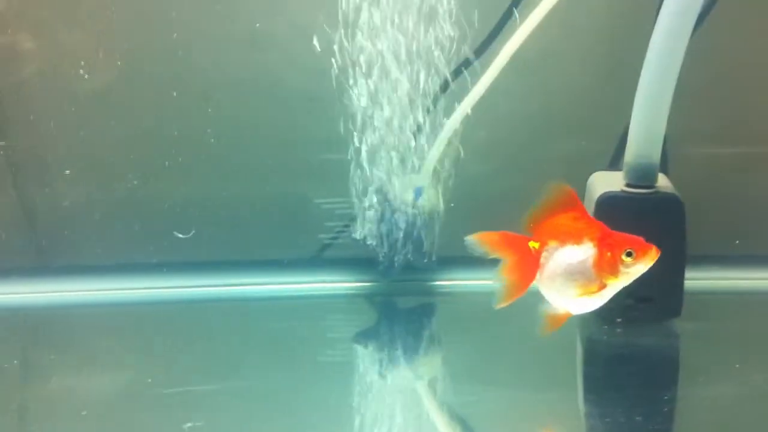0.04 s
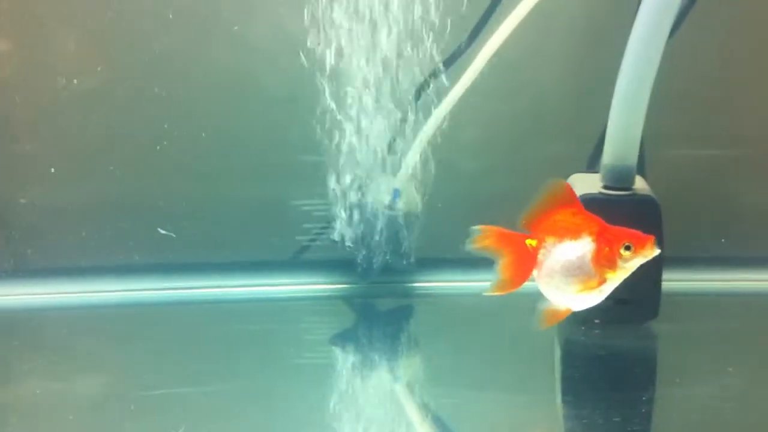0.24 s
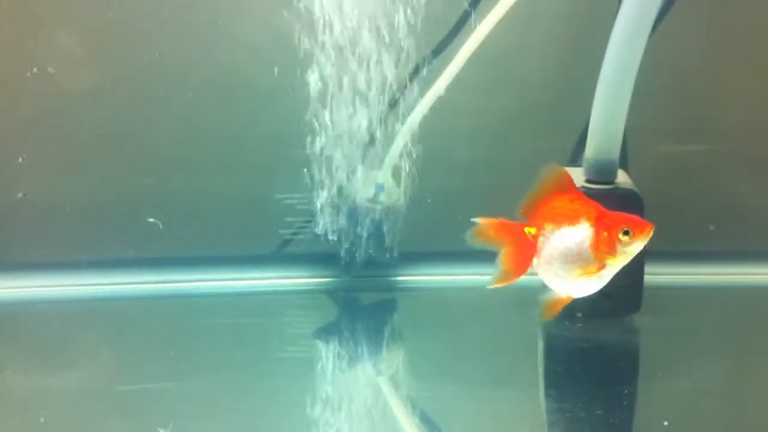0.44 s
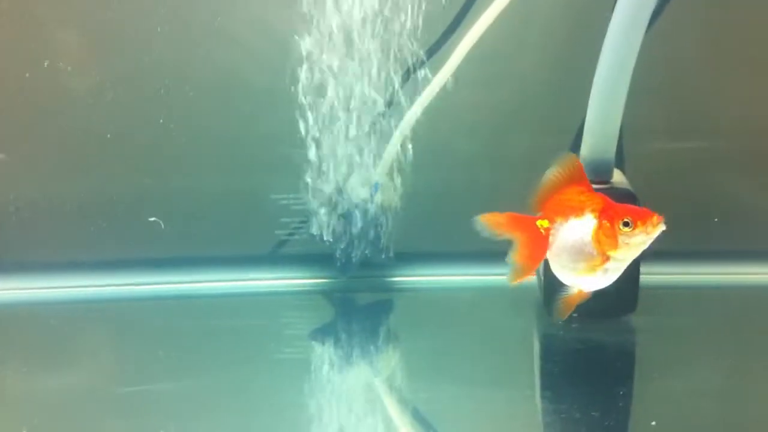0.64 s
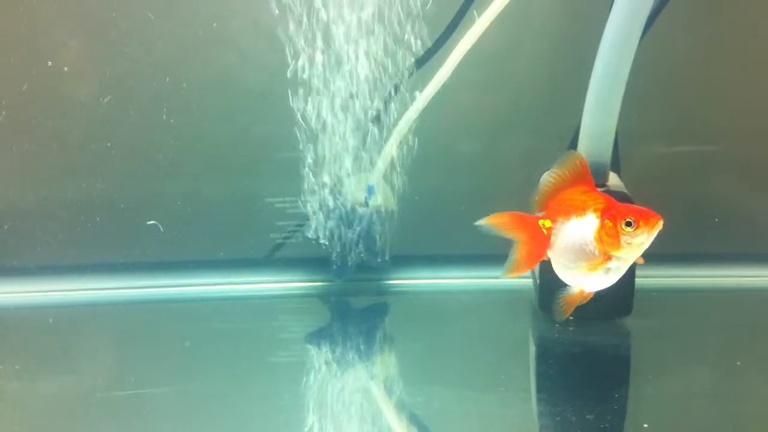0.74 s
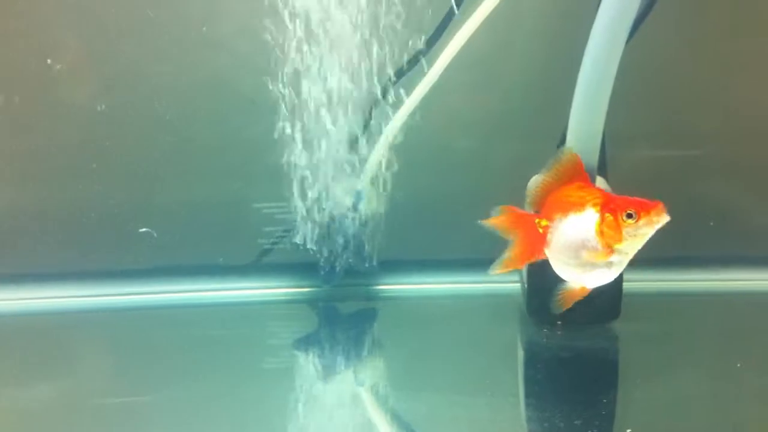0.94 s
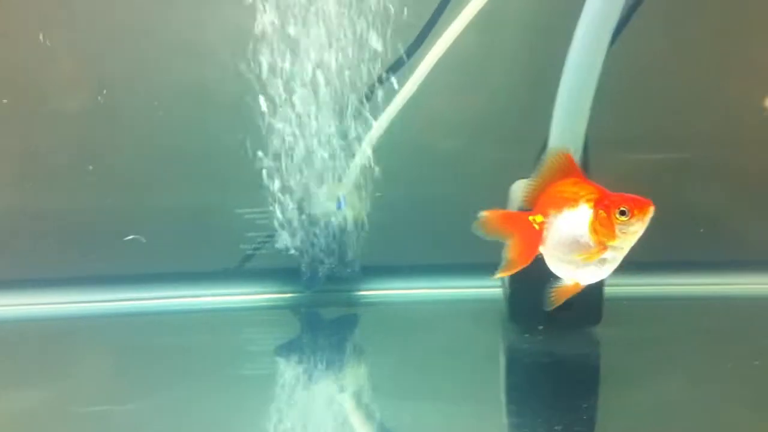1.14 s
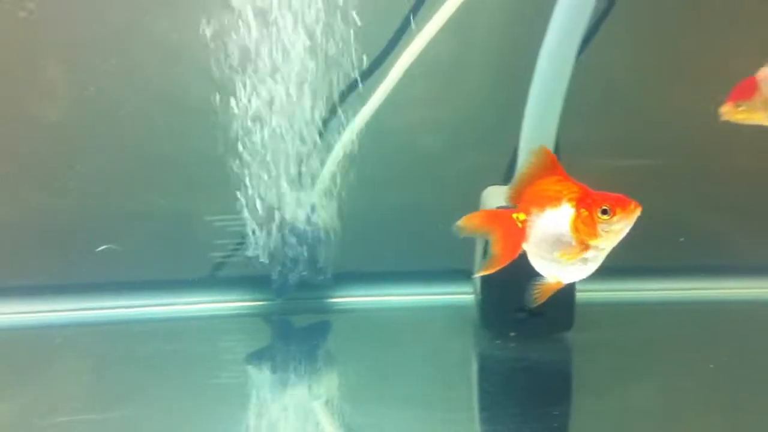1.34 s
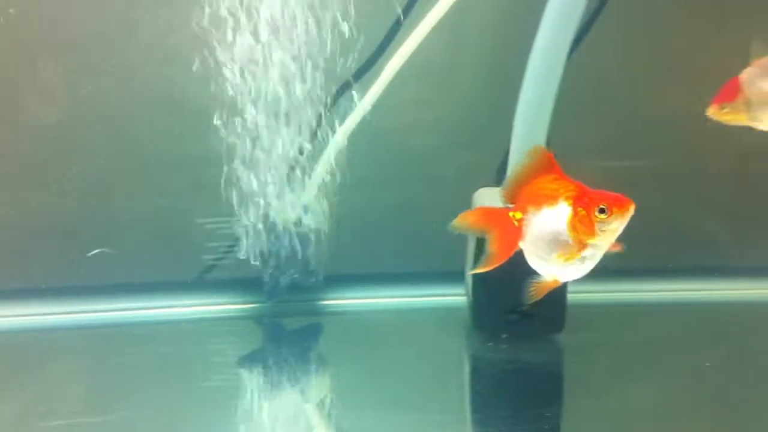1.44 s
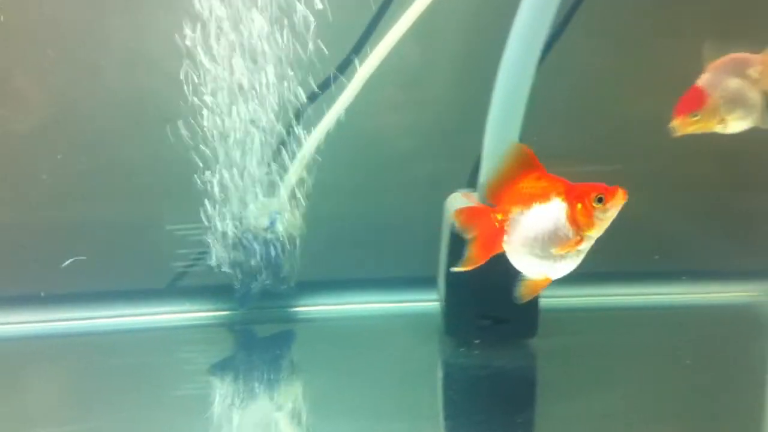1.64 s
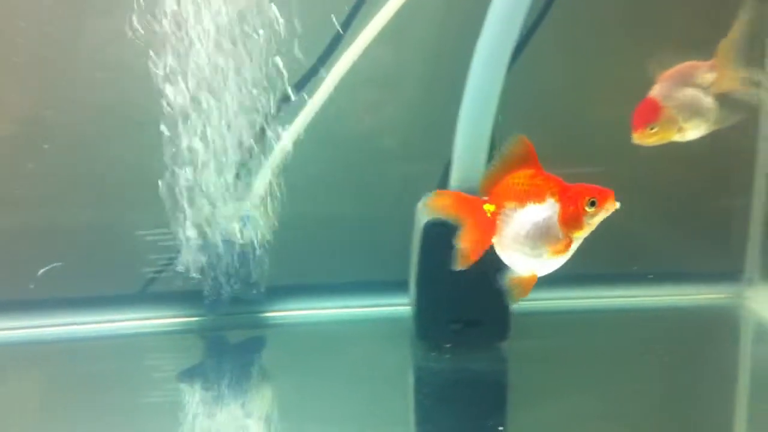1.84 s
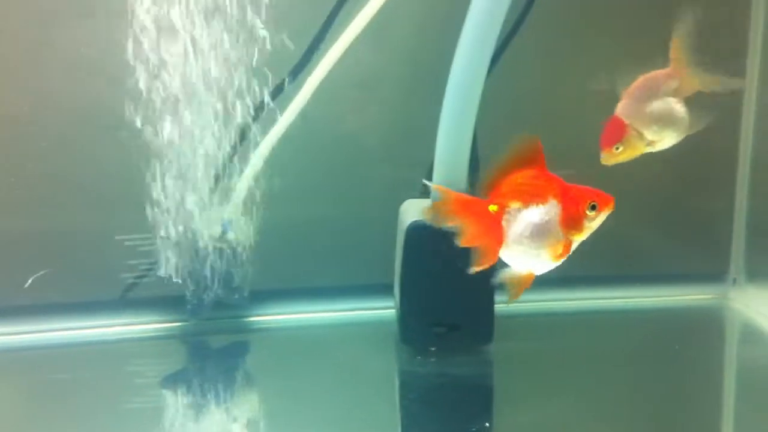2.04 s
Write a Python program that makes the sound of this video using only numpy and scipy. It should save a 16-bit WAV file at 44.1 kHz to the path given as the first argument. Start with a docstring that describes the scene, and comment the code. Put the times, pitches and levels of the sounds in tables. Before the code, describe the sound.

Air stone bubbling in a home fish tank: a continuous watery rush with single gurgles, quick flurries of tiny bubbles and fine surface fizz over a low wavering pump hum, heard close through air in a small room.

```python
"""An air stone bubbles in a home fish tank, heard through air in a small room, for about two seconds.
From the start a dense rush of damped bubble tones and noise runs over the air pump's hum of sines.
Flurries of tiny bubbles (clouds of very short rings) and single large gurgles soon join and recur.
Near 1.2 s the wavering strongest overtone of the hum all but vanishes for a moment; gurgles crowd near
1.83 s, and the fine fizz of surface bursts, heard throughout, is strongest at the very end."""
import sys
import numpy as np
from scipy import signal
from scipy.fft import rfft, irfft, next_fast_len
from scipy.io import wavfile
from scipy.ndimage import uniform_filter1d, map_coordinates

SR = 44100
rng = np.random.default_rng(int(sys.argv[2]) if len(sys.argv) > 2 else 0)


def boost_factor(decibels):
    """Convert a level in decibels to a linear amplitude factor."""
    exponent = np.asarray(decibels, float) / 20
    return 10 ** exponent


def dump(signal):
    """Clip the signal to [-1, 1] and save it as 16-bit WAV at the path in sys.argv[1]."""
    limited = np.clip(np.atleast_2d(signal).T, -1, 1)
    pcm = np.round(limited * 32767).astype(np.int16)
    wavfile.write(sys.argv[1], SR, pcm)


N = 91860  # length in samples
SIZE_SCATTER_DB = 3.5  # standard deviation of the energy of bubbles in a stream or flurry


def unit(x):
    """Normalisation: scale to rms 1."""
    return x / np.sqrt(np.mean(x ** 2) + 1e-20)


def curve(rows):
    """Linear interpolation: (time [s], value) rows as one value per sample."""
    time_s, value = np.transpose(rows)
    return np.interp(np.arange(N) / SR, time_s, value)


def wobble(rate):
    """Band-limited randomness: a smooth curve through random knots, rate of them a second."""
    knots = rng.standard_normal(400)
    return map_coordinates(knots, [np.arange(N) * rate / SR], mode="mirror")


def coloured(x, points):
    """Linear filtering: weights the spectrum of x by (frequency [Hz], gain [dB]) points, to rms 1."""
    hz, db = np.transpose(points)
    size = next_fast_len(N + 8192)
    bin_hz = np.fft.rfftfreq(size, 1 / SR)
    gain_db = np.interp(np.log(bin_hz + 1), np.log(hz + 1), db)  # read on a log axis
    return unit(irfft(rfft(x, size) * boost_factor(gain_db), size)[:N])


def patchy(x, patchy_db, bins, frames):
    """Random modulation: patches of gain in time and frequency, patchy_db rms."""
    spectrum = signal.stft(x, nperseg=256)[2]
    field = rng.standard_normal(spectrum.shape)
    for _ in range(2):
        field = uniform_filter1d(field, bins, axis=0)
        field = uniform_filter1d(field, frames, axis=1)
    return signal.istft(spectrum * boost_factor(patchy_db * unit(field)), nperseg=256)[1][:N]


def bubbles(start_s, hz, energy, life_s, size):
    """Bubble resonance: soft-starting, damped, rising sines; energy is level squared x seconds."""
    rise_per_s = 0.4  # fractional rise in pitch
    start_s = np.clip(start_s, 0, N / SR)
    first = np.ceil(start_s * SR).astype(int)
    index = first[:, None] + np.arange(size)
    t = index / SR - start_s[:, None]
    life_s = np.reshape(life_s, (-1, 1))
    envelope = t / life_s * np.exp(-2 * t / life_s)  # peaks at half the life
    ring = envelope * np.sin(2 * np.pi * hz[:, None] * t * (1 + rise_per_s * t / 2))
    ring *= np.sqrt(64 * energy[:, None] / life_s)  # the envelope and sine alone hold life / 64
    return np.bincount(index.ravel(), ring.ravel(), N + 2 * size)[:N]


def stream(lo_hz, hi_hz, life_s, share, count, size):
    """Superposition: bubbles at random times and pitches over white noise; share weights their power."""
    when, pitch = rng.random((count, 2)).T
    energy = boost_factor(2 * SIZE_SCATTER_DB * rng.standard_normal(count))
    grains = bubbles(when * N / SR, lo_hz + (hi_hz - lo_hz) * pitch, energy, life_s, size)
    # as much power as white noise of rms 1 has in the same band
    grains *= np.sqrt((hi_hz - lo_hz) / (SR / 2)) / np.std(grains)
    return np.sqrt(share) * grains + np.sqrt(1 - share) * rng.standard_normal(N)


def room(x, wet_db):
    """Diffuse reverberation: convolution with exponentially decaying noise, added to the direct sound."""
    t60_s = 0.23
    t = np.arange(SR // 4) / SR
    tail = rng.standard_normal(len(t)) * boost_factor(-60 * t / t60_s)
    return x + boost_factor(wet_db) * signal.fftconvolve(x, tail / np.linalg.norm(tail))[:N]


def rush():
    """Resonant filtering: larger bubbles leaving the stone ring through water and glass."""
    # resonances of water and glass: (frequency [Hz], relative density [dB per Hz])
    rush_colour = [(30, -59), (85, -37), (125, -16), (175, -11), (200, -5), (222, -3.5), (245, 3.5),
                   (285, -5.5), (335, -16), (410, -7), (430, -3), (520, -10.5), (660, -4.5), (760, -12),
                   (810, -8.5), (1080, -7.5), (1118, -10.5), (1160, -8.5), (1450, -11.5), (1650, -9.5),
                   (1800, -9.5), (1910, -10), (2000, -10), (2400, -24), (3500, -23.5), (6000, -46.5),
                   (16000, -34)]
    # swell of the rush, of which only the departure from its mean counts: (time [s], level [dB])
    rush_swell = [(0.0, -51), (0.45, -52.5), (0.47, -50.5), (0.74, -51.5), (0.89, -50.5), (1.15, -53),
                  (1.21, -50.5), (1.78, -51.5), (1.8, -51.5), (2.01, -53), (2.03, -51), (2.08, -49)]
    mean_db = -48
    x = stream(357, 3038, life_s=0.013, share=0.29, count=1400, size=1200)
    x = coloured(room(x, wet_db=-13), rush_colour)
    swell_db = curve(rush_swell)
    return boost_factor(mean_db + swell_db - swell_db.mean()) * x


def gurgles():
    """Free damped oscillation: single large bubbles ring out of the rush."""
    # single bubbles: (start [s], pitch [Hz], direct level over the ring life [dB], ring life [s])
    gurgle_rings = [(.035, 813, -55, 0.027), (0.112, 1556, -53.5, 0.013), (.2, 2700, -59.5, .02),
                    (.455, 1008, -60, 0.027), (0.461, 1940, -69, 0.015), (.528, 893, -59, 0.031),
                    (.595, 606, -52, 0.024), (.778, 430, -53, 0.024), (.8, 593, -56, 0.036),
                    (.862, 932, -54.5, 0.031), (.87, 794, -55, .035), (0.889, 429, -52, 0.042),
                    (0.994, 1487, -56.5, .03), (1.01, 1646, -52.5, .025), (1.192, 601, -50.5, 0.027),
                    (1.235, 662, -54, 0.036), (1.27, 1285, -57, .025), (1.281, 1954, -55, 0.028),
                    (1.313, 1600, -53, .02), (1.35, 2870, -55.5, 0.016), (1.37, 1120, -54, 0.049),
                    (1.396, 1000, -58, 0.028), (1.43, 423, -52.5, 0.018), (1.465, 2160, -58, .03),
                    (1.51, 2040, -55, 0.021), (1.632, 2570, -57, .02), (1.67, 438, -53.5, .025),
                    (1.785, 670, -54.5, 0.026), (1.815, 431, -52, 0.031), (1.823, 1890, -54, 0.023),
                    (1.825, 1270, -56, .025), (1.831, 2915, -53, .012), (1.846, 2790, -56, 0.01),
                    (1.851, 890, -55.5, 0.036), (1.855, 563, -56, 0.026), (1.963, 667, -54, 0.026),
                    (2.02, 677, -52.5, 0.033), (2.025, 2056, -56, .025)]
    start_s, hz, db, life_s = np.transpose(gurgle_rings)
    return room(bubbles(start_s, hz, boost_factor(2 * db) * life_s, life_s, size=7000), wet_db=-16)


def flurries(count=45):
    """Clustered impulses: each flurry is a cloud of like-sized bubbles bursting almost together."""
    # bursting clouds:
    # (centre [s], pitch [Hz], pitch scatter [Hz], length [s], direct rms level over the length [dB])
    clouds = [ (0.048, 9700, 400, 0.029, -60), (0.093, 14000, 1200, 0.021, -58),
              (0.109, 10700, 700, 0.024, -55), (0.212, 4800, 300, 0.02, -55.5),
              (0.213, 3330, 300, .015, -58), (.335, 7500, 500, 0.023, -60), (0.387, 15200, 600, .05, -60),
              (0.402, 12300, 700, 0.037, -57), (0.412, 6970, 450, 0.04, -58),
              (0.434, 4100, 250, 0.016, -58), (0.444, 4440, 200, 0.029, -57), (.445, 3570, 500, 0.032, -62),
              (0.56, 9800, 1500, 0.024, -55), (0.81, 10200, 1200, 0.027, -57.5),
              (0.844, 4350, 400, 0.018, -58), (0.885, 3700, 503, 0.046, -58.5),
              (0.939, 5800, 150, .006, -51), (0.952, 5790, 150, .01, -53), (1.018, 4950, 400, 0.049, -61),
              (1.058, 9400, 1490, 0.02, -53.5), (1.128, 9400, 900, 0.026, -56),
              (1.129, 13000, 900, 0.023, -63), (1.158, 3530, 300, 0.029, -58),
              (1.276, 7760, 804, 0.016, -55.5), (1.286, 11600, 400, 0.016, -63),
              (1.292, 1910, 248, .03, -56), (1.364, 3300, 300, 0.024, -54.5),
              (1.359, 4330, 250, .035, -56.5), (1.397, 3480, 300, 0.062, -60),
              (1.364, 6100, 700, 0.028, -64), (1.365, 11700, 1600, 0.028, -58),
              (1.43, 14600, 1000, 0.026, -62), (1.437, 11100, 1500, .03, -55.5),
              (1.445, 5350, 990, 0.019, -57.5), (1.495, 4340, 400, 0.018, -56),
              (1.496, 14000, 1000, 0.025, -66), (1.589, 10100, 700, 0.023, -58),
              (1.663, 4440, 500, 0.027, -57), (1.738, 11800, 2500, 0.034, -56),
              (1.73, 8700, 400, 0.04, -58.5), (1.749, 7000, 450, 0.034, -56.5),
              (1.807, 10500, 800, 0.027, -57), (1.811, 8800, 400, 0.022, -58),
              (1.845, 5200, 400, .025, -58), (1.847, 2720, 250, 0.032, -56),
              (1.891, 4450, 600, 0.036, -56.5), (1.894, 7600, 400, 0.033, -59.5),
              (1.902, 10100, 450, 0.024, -57), (1.95, 6300, 700, 0.021, -55),
              (1.97, 13300, 1500, .025, -57.5), (2.038, 13100, 1200, 0.028, -56),
              (2.035, 3800, 1010, 0.025, -53.5)]
    ring_sharpness = 0.62  # ring life [s] x pitch scatter [Hz]
    centre_s, hz, scatter_hz, length_s, db = np.transpose(clouds)[:, :, None]
    when, pitch, loudness = np.moveaxis(rng.standard_normal((len(clouds), count, 3)), 2, 0)
    start_s = centre_s + length_s * when / 3  # the length is three standard deviations
    tone_hz = np.clip(hz + scatter_hz * pitch, 500, 17000)
    share = boost_factor(2 * SIZE_SCATTER_DB * loudness)
    energy = boost_factor(2 * db) * length_s * share / share.sum(1, keepdims=True)
    life_s = np.repeat(ring_sharpness / scatter_hz, count)
    x = bubbles(start_s.ravel(), tone_hz.ravel(), energy.ravel(), life_s, size=400)
    return room(x, wet_db=-8)


def fizz():
    """Shot noise: countless tiny bubbles burst all over the surface."""
    # colour of the fizz: (frequency [Hz], relative density [dB per Hz])
    fizz_colour = [(1180, -21), (2000, -5), (3070, -7), (3940, -10), (4410, -7), (7070, -10.5),
                   (11200, -11), (13500, -16), (15600, -21)]
    # swelling as the plume breaks the surface: (time [s], level [dB])
    fizz_swell = [(0.0, -53), (0.11, -52), (0.14, -52.5), (0.22, -52), (0.25, -54.5), (0.43, -51),
                  (0.53, -57), (0.56, -53.5), (0.63, -55), (0.68, -53.5), (1.15, -53), (1.22, -53.5),
                  (1.27, -52.5), (1.34, -55.5), (1.35, -50.5), (1.42, -55), (1.44, -50), (1.62, -55.5),
                  (1.65, -52.5), (1.69, -54), (1.75, -52), (1.78, -54), (1.85, -52), (2.02, -51),
                  (2.03, -49.5), (2.06, -53.5), (2.08, -48.5)]
    x = stream(2024, 15720, life_s=0.0013, share=0.2, count=6000, size=300)
    x = patchy(room(x, wet_db=-3), patchy_db=1.5, bins=6, frames=6)
    return boost_factor(curve(fizz_swell)) * coloured(x, fizz_colour)


def pump():
    """Harmonic series: steady multiples of the stroke rate, and an overtone wavering in level and phase."""
    # steady hum lines: (frequency [Hz], rms level [dB])
    hum_lines = [(50, -85.5), (100, -69.5), (125, -75), (150, -71), (175, -66), (275, -63), (300, -58.5),
                 (350, -67.5), (400, -72), (450, -84), (550, -71), (600, -66.5)]
    # the wavering overtone: (time [s], rms level [dB])
    drone_swell = [(0.0, -46.5), (0.09, -51.5), (0.14, -63), (0.17, -47), (0.22, -50.5), (0.27, -55),
                   (0.3, -51), (0.44, -52), (0.47, -59), (0.62, -48), (0.67, -53.5), (0.71, -49.5),
                   (0.81, -55), (0.84, -52.5), (0.97, -57.5), (1.0, -51), (1.03, -59), (1.13, -49.5),
                   (1.15, -49), (1.2, -84), (1.24, -47.5), (1.34, -53), (1.37, -58), (1.44, -45),
                   (1.49, -48.5), (1.54, -62), (1.59, -54), (1.77, -49), (1.83, -63), (1.85, -52.5),
                   (1.88, -48), (1.92, -69), (1.95, -46), (2.01, -68), (2.05, -51), (2.08, -51)]
    drone_hz, drift_rad = 200.5, 0.7  # phase drift for a wobble of 1
    t = np.arange(N) / SR
    hum = sum(boost_factor(db) * np.sin(2 * np.pi * (hz * t + rng.random())) for hz, db in hum_lines)
    drone_phase = 2 * np.pi * drone_hz * t + drift_rad * wobble(16.0)
    drone = boost_factor(curve(drone_swell)) * np.sin(drone_phase)
    return np.sqrt(2) * (hum + drone)  # rms to peak


def scene():
    """Linear superposition: every source sums at one microphone."""
    return (rush() + gurgles() + flurries() + fizz() + pump())[None]


def roll_off(x):
    """The treble ends steeply here."""
    return signal.sosfilt(signal.butter(12, 15730, fs=SR, output="sos"), x)


def record(dry):
    """High-pass response: the microphone drops the deep bass."""
    low_cut = signal.butter(2, 70, "high", fs=SR, output="sos")  # corner in Hz
    mix = signal.sosfilt(low_cut, dry)
    return roll_off(mix)


dry = scene()
out = record(dry)
dump(out)
```